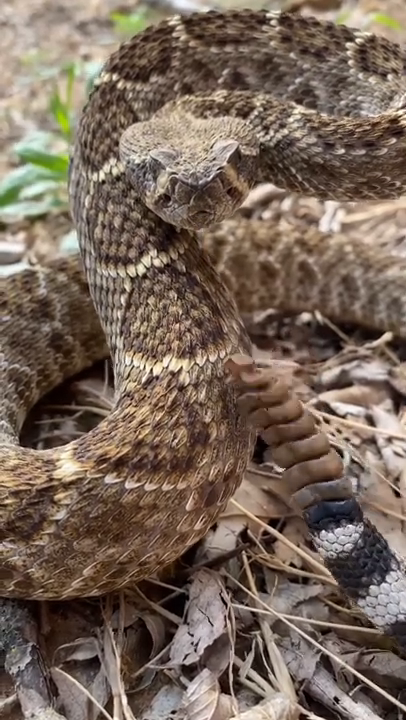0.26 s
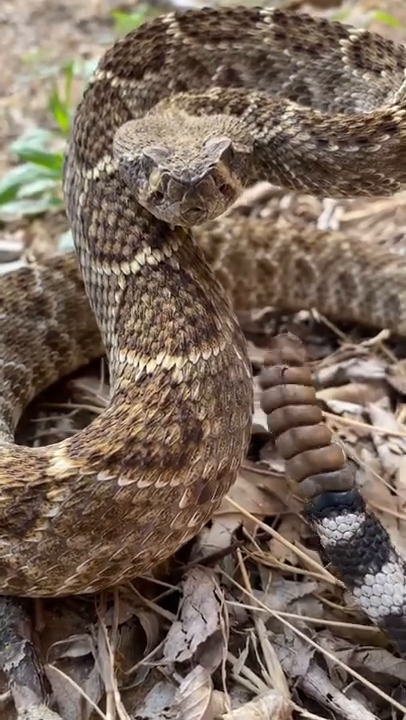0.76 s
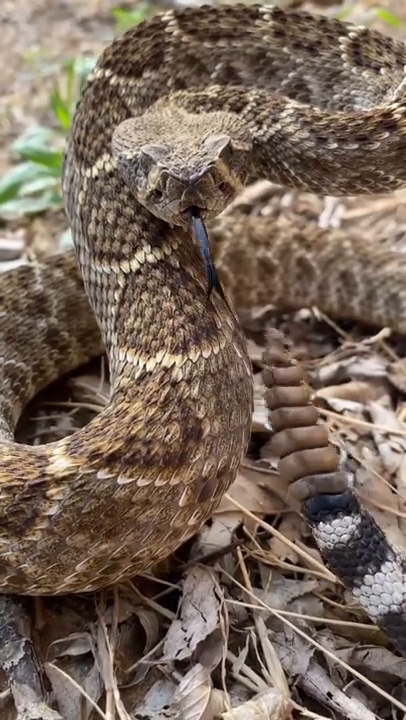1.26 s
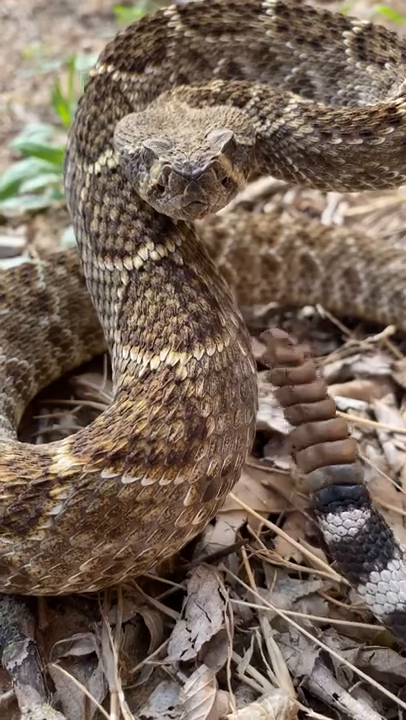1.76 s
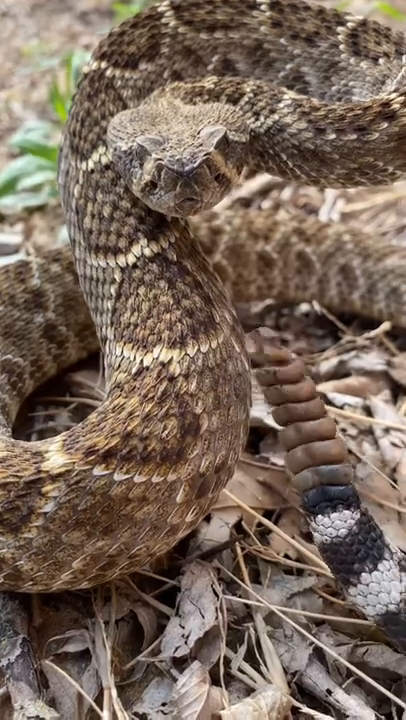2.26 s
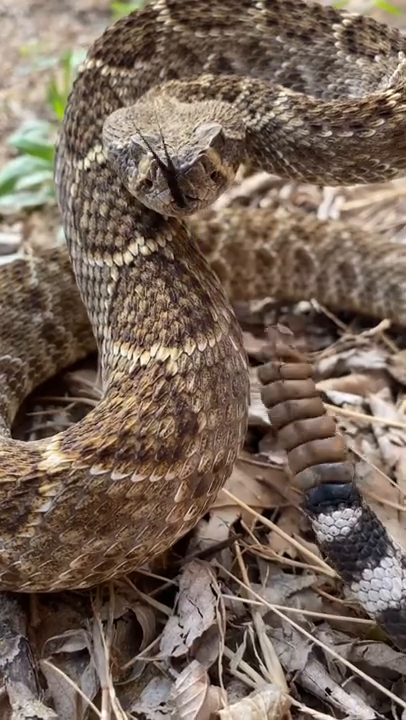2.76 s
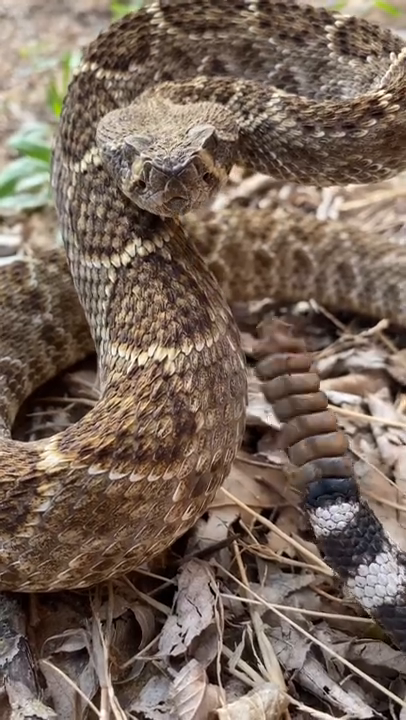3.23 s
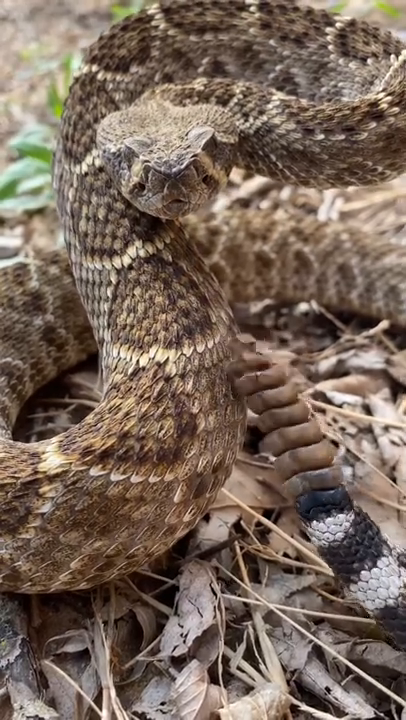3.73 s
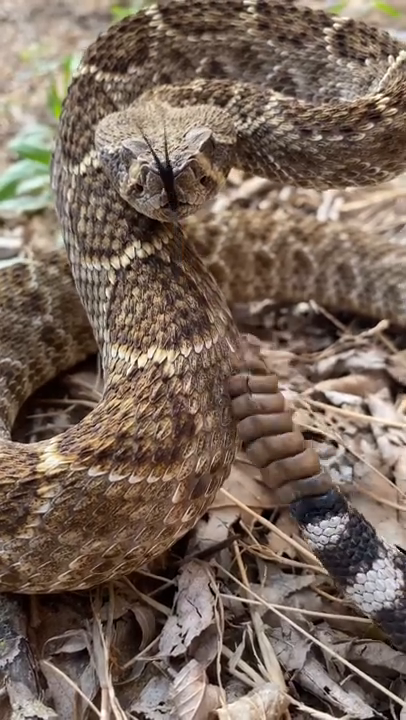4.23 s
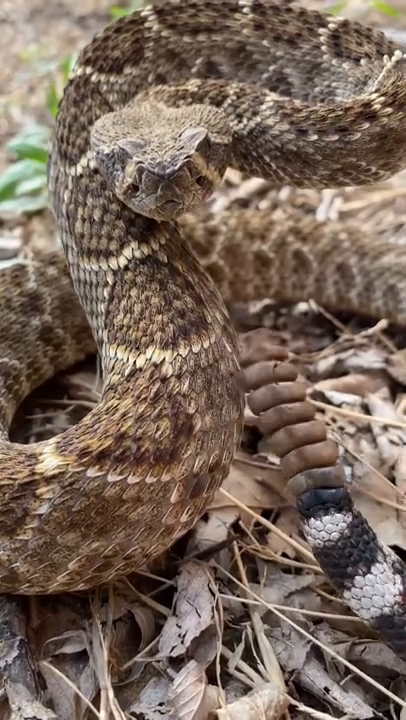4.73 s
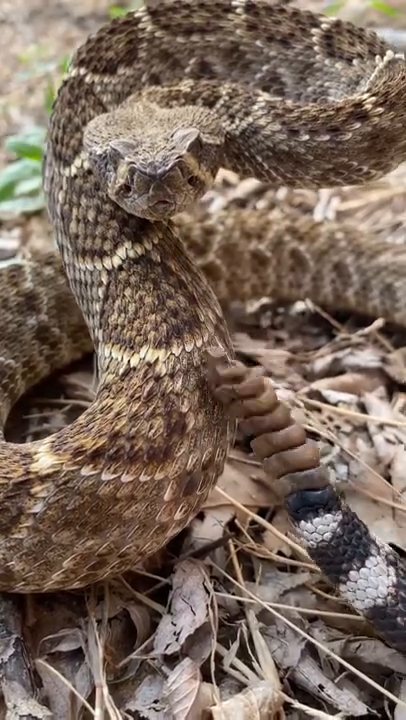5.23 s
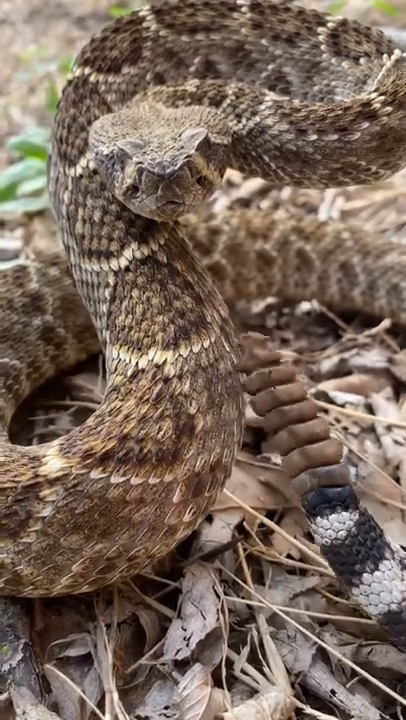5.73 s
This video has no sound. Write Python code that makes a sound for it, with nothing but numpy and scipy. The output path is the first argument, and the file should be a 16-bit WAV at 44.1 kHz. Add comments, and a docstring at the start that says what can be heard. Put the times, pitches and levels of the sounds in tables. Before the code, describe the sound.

A rattlesnake buzzes its tail without pause, very close to a stereo microphone outdoors. The dry, bright sound flutters about twenty-two times a second, thick with tiny clicks and a leafy hiss. Irregular catches and hard snaps stick out, more in the second half. Low wind thumps nudge the microphone around one and a half seconds and near the end, over a faint rumble.

```python
"""A dry, fierce buzz runs throughout: a coiled rattlesnake shaking its tail, close to the microphone.
About 22 sweeps a second each throw a shower of tiny pings between the hollow horn segments, with hard catches
and single snaps standing out. Dry leaf litter under the tail scatters the buzz as a fine hiss.
Light gusts and low thumps buffet the two microphone ports, as noise and short pulses.
Beneath lie a low outdoor rumble and a faint far drone, both of coloured noise."""
import sys
import numpy as np
from scipy import signal
from scipy.fft import rfft, irfft, next_fast_len
from scipy.io import wavfile
from scipy.ndimage import uniform_filter1d, map_coordinates

SR = 44100
rng = np.random.default_rng(int(sys.argv[2]) if len(sys.argv) > 2 else 0)


def output_pcm(signal):
    """Save a mono or channel-first signal as 16-bit PCM at the path in sys.argv[1].

    Samples are clipped to [-1, 1] before scaling.
    """
    pcm = np.clip(np.atleast_2d(signal).T, -1, 1) * 32767
    wavfile.write(sys.argv[1], SR, np.round(pcm).astype(np.int16))


N = 264159

# the tail's pace: time_s, pace_sweeps_per_s
TAIL_PACE = [(0.0, 19.25), (0.1, 21.2), (0.4, 20.77), (0.5, 23.21), (0.9, 21.29), (1.0, 22.4), (1.1, 21.26),
             (1.2, 23.56), (1.3, 19.76), (1.5, 22.79), (1.8, 23.29), (2.0, 21.58), (2.3, 20.81),
             (2.4, 23.19), (2.6, 22.5), (2.8, 23.34), (3.0, 22.02), (3.1, 22.63), (3.4, 21.45),
             (3.8, 21.65), (4.0, 19.97), (4.1, 20.98), (4.3, 19.93), (4.5, 22.83), (4.6, 20.78),
             (4.7, 22.0), (4.9, 21.38), (5.0, 22.55), (5.2, 20.31), (5.4, 22.17), (5.7, 21.87),
             (6.0, 23.62)]
# how far the rattle settles between sweeps: time_s, depth_multiple (of the sweep shape below)
SWING_DEPTH = [(0, .95), (1.7, .85), (2.1, .95), (2.6, .85), (3.1, .95), (3.3, 1.5), (5.0, 1.5), (5.6, 1.3),
               (6, .95)]
# force through one sweep of the tail: phase_cycles, strength_db
SWEEP_SHAPE = [(0, -3), (.14, 0), (.28, 2.9), (.56, 2.3), (.8, -3.3), (.92, -4.6), (1, -3)]
# hard catches, where loose segments land together: landing_s, force_after_db, force_before_db
# (both relative to the rms force; the one before is mostly a hush)
HARD_CATCHES = [(0.022, 5, -9), (0.353, -1, -14), (0.406, 3.0, -8.0), (0.541, 4, -2), (0.671, 6, -7),
                (0.807, 8, -9), (0.991, 2, -12), (1.128, 4, -8.0), (1.311, 5.0, -7), (1.674, 8, -3),
                (2.023, 3, -10), (2.215, 3.0, -11), (2.83, -3.0, -12), (2.925, 13, -8), (3.104, -1, -3),
                (3.234, 0, -12), (3.288, 4, -4.0), (3.328, 1.5, -9), (3.422, 7, -6.5), (3.513, 3.0, -10),
                (3.606, 3, -5.0), (3.657, 3, -12), (3.754, 27, 3), (3.839, 6, -7.0), (3.939, 6, -17),
                (3.979, 2.0, -15), (4.129, 2, -7.0), (4.228, 12, -10), (4.279, 6, -5), (4.376, 7, -9),
                (4.426, 5.0, -3.0), (4.651, 4.0, -8.0), (4.883, 11, -7.0), (4.938, 17, 12),
                (5.021, 5, -4.0), (5.208, 15, -7), (5.256, 5, -2), (5.442, 17, 2), (5.487, 2.5, -4.0),
                (5.574, 4.0, -12), (5.851, 11, -2), (5.936, 0, -4)]
# single hard snaps that stand out of the buzz: time_s, strength_db (the strongest is its peak over the rms buzz)
SINGLE_SNAPS = [(2.088, 14), (4.19, 19), (4.388, 16), (4.429, 9), (4.651, -8), (4.662, 22), (4.893, 11)]
# ring of the horn segments: frequency_hz, relative_level_db_per_hz
SHELL_RING = [(200, -38), (600, -27), (950, -22.3), (1900, -26.2), (2550, -21.7), (2900, -21),
              (3550, -11.3), (4000, -11.3), (4300, -8.6), (4680, -4.3), (4980, -6.3), (5800, 0),
              (6700, -4.3), (7250, -3.8), (7850, -11.2), (9200, -7.7), (10300, -13.2), (12600, -8),
              (15500, -16)]
# ring of the small tip segments: frequency_hz, relative_level_db_per_hz
TIP_RING = [(200, -77), (5000, -47), (8000, -3), (9500, 15), (12500, -4), (15500, -1)]
# how much of the rattle the leaves scatter: frequency_hz, level_db (relative to the direct sound)
LEAF_SCATTER = [(500, -1), (1000, -6.5), (1800, -9), (2400, -1.5), (3300, -1), (5000, -4), (5600, -10),
                (7100, -6.5), (7900, -1.5), (9000, -4.5), (10400, -3.5), (12500, -13)]
# the rattle at the two microphone ports: frequency_hz, left_minus_right_db
PORT_BALANCE = [(200, 3), (600, 7), (1000, -1.5), (1900, -2.5), (2400, -10), (3400, -12), (4250, 4.5),
                (4650, 1), (4950, -6), (5400, 0)]
# phase between the ports: frequency_hz, left_lead_rad
PORT_LEAD = [(200, 0), (600, -1.5), (1300, -.9), (2550, .6), (3300, -2.8), (4100, -2.4), (4400, -3.8),
             (4850, -3), (5060, .4), (6600, .5), (8000, 1.7), (9500, 2.1), (11500, np.pi)]
# puffs of wind on the microphone: start_s, length_s, level_db
WIND_PUFFS = [(0, 1.13, -51), (0.526, 0.12, -56), (1.173, 0.25, -45.5), (1.492, 0.23, -42),
              (4.275, 0.22, -51), (4.697, 0.4, -59.5), (5.43, 0.31, -42.5), (5.798, 0.38, -41)]
# colour of the wind buffeting: frequency_hz, relative_level_db_per_hz
BUFFET_COLOUR = [(20, -36), (46, 1.5), (72, -1), (140, -12), (200, -19.5), (400, -25), (800, -62)]
# the strongest eddies at the microphone: time_s, pitch_hz, peak_db
EDDIES = [(0.591, 90, -37), (1.159, 65, -39), (1.202, 130, -39), (1.221, 75, -30), (1.288, 118, -34),
          (1.31, 64.7, -35), (1.485, 80, -33), (1.501, 159, -35), (1.516, 70, -26.5), (1.589, 136, -28.5),
          (1.622, 110, -34), (1.62, 251, -35), (1.666, 136, -34), (1.685, 85, -31), (1.715, 83.6, -38),
          (5.457, 110, -39), (5.566, 108, -34), (5.812, 100, -36.5), (5.881, 80.4, -31.5)]
# colour of the outdoor background: frequency_hz, relative_level_db_per_hz
AIR_COLOUR = [(20, -37), (36, -13), (55, -2.5), (100, 0), (150, -7.5), (230, -5.5), (330, -13), (600, -22),
              (1200, -47), (4000, -12.5), (15000, -85)]
# background level: time_s, level_db
RUMBLE_LEVEL = [(0, -50.5), (1, -50.5), (2, -53.5), (2.8, -54), (2.92, -51.5), (4.2, -51), (6, -48)]
# colour of a far drone: frequency_hz, relative_level_db_per_hz
DRONE_COLOUR = [(80, -29), (165, -2.5), (240, -7), (330, -14), (600, -44)]
# the drone swells, fades and swells again: time_s, level_db
DRONE_LEVEL = [(1.8, -65.5), (2.6, -56), (3.6, -55.5), (4.4, -65), (5.3, -55.5)]

RATTLE_DB, DB_PER_SWEEP = -28, 0.25  # level at the mean pace and swing 1; dB per extra sweep a second
SWING_DB = 0.34  # extra level, dB per unit of swing depth
LIMP_CYCLES = 0.0037  # left and right sweeps are a little unequal
FLIGHT_S, CATCH_S, LANDING_S = 0.012, 0.0098, 0.0016  # before a catch; the catch; segments not landing quite at once
# dull knocks early in each sweep: rise and fall of their level, phase of the peak in cycles, upper edge
EARLY_DB, EARLY_PEAK, HOLLOW_HZ = 1.93, 0.13, 2460
BRIGHT_DB, BRIGHT_HZ = 5.5, 9700  # wider swings clash brighter: dB per unit of swing; lower edge of that treble
GUST_RISE_S, GUST_FALL_S = 0.072, 0.087  # each puff builds before its start and dies after its end
LOW_CUT_HZ, TOP_HZ = 32, 15800  # microphone bass roll-off and band limit


def snake(wander_db=0.43):
    """The direct and the scattered rattle reach two microphone ports of unlike colour and phase."""
    phase = sweep_phase()
    force = shaking(phase)
    sides = np.array([[.5], [-.5]])
    direct = filtered(rattle(force), lambda hz: np.exp(1j * sides * along(PORT_LEAD, hz)))
    scattered = filtered(leaves(force), lambda hz: amp(along(LEAF_SCATTER, hz)))

    def ports(hz):
        """Port balance; scattering shares out the sound's energy without adding to it."""
        return amp(sides * along(PORT_BALANCE, hz)) / np.hypot(1, amp(along(LEAF_SCATTER, hz)))

    heard = filtered(stroke_colour(direct + scattered, phase), ports)
    pace = curve(TAIL_PACE)
    effort_db = RATTLE_DB + DB_PER_SWEEP * (pace - pace.mean())
    effort_db = effort_db + SWING_DB * (curve(SWING_DEPTH) - 1) + wander_db * wobble(4.6)
    return amp(effort_db) * levelled(heard, 2 / pace.mean())


def sweep_phase():
    """How far the tail is through its present sweep, 0-1, from its summed and slightly unsteady pace."""
    cycle = .72 + np.cumsum(curve(TAIL_PACE)) / SR + .008 * wobble(27)
    return (cycle - LIMP_CYCLES * np.cos(np.pi * cycle)) % 1


def shaking(phase, ceiling_db=6):
    """Force on the segments: it swells in every sweep, up to what their joints allow, with evened energy."""
    sweep_s = 1 / np.mean(curve(TAIL_PACE))
    sweep_db = curve(SWING_DEPTH) * np.interp(phase, *np.transpose(SWEEP_SHAPE))
    force = catches(unit(amp(sweep_db) * levelled(tumbles(), sweep_s / 2)))
    force = force / (1 + (force / amp(ceiling_db)) ** 4) ** .25
    return levelled(force, sweep_s)


def tumbles(count=1200, irregular=.45, spread_db=0.2, width=0.0015, between_db=-12, size=512):
    """The segments land in groups, a few milliseconds apart: separate bursts with quiet gaps, rms 1."""
    t = np.arange(-size, size + 1) / SR
    gaps, strengths = rng.standard_normal((2, count))
    gaps = np.exp(irregular * np.clip(gaps, -2, 2))
    start = ((np.cumsum(gaps) - gaps) / gaps.sum() * N).astype(int)
    blows = np.bincount(start, amp(spread_db * strengths) ** 2, N)
    power = abs(signal.fftconvolve(blows, np.exp(-abs(t) / width), "same"))
    return unit(np.sqrt(power / power.mean() + amp(between_db) ** 2))


def catches(force):
    """The segments fly free for a moment, then land together: the force steps between two levels."""
    force = force.copy()
    for landing_s, after_db, before_db in HARD_CATCHES:
        t = np.arange(N) / SR - landing_s
        close = abs(t) < .05
        t = t[close]
        near = np.exp(-(t / np.where(t < 0, FLIGHT_S, CATCH_S)) ** 4)
        landed = (1 + np.tanh(t / LANDING_S)) / 2
        caught = (1 - landed) * amp(before_db) + landed * amp(after_db)
        force[close] = (1 - near) * force[close] + near * caught
    return force


def rattle(force, knock_db=-4, tick_db=-10):
    """Hard knocks among many light touches ring the hollow segments; the tip adds small bright ticks."""
    touches = collisions(count=45000, spread_db=1.0, life=0.00024, scatter=2)
    knocks = collisions(count=6000, spread_db=1.5, life=.00005, scatter=.3)
    ticks = collisions(count=1800, spread_db=6.0, life=.00005, scatter=2.3)
    shell = unit(ring(force * (touches + amp(knock_db) * knocks), SHELL_RING))
    tip = unit(ring(force * ticks, TIP_RING))
    return shell + snaps() + amp(tick_db) * tip


def collisions(count, spread_db, life, scatter, size=64):
    """Tiny decaying pings in an uneven chain (scatter in mean gaps), each of its own strength and pitch."""
    t = np.arange(size) / SR
    place = np.arange(count) + scatter * rng.standard_normal(count)
    start = (place * N / count).astype(int) % N
    pitch_hz = rng.uniform(0, TOP_HZ, (count, 1))
    angle = rng.uniform(0, 2 * np.pi, (count, 1))
    strength = amp(spread_db * np.clip(rng.standard_normal((count, 1)), -3, 2))
    pings = strength * np.sin(2 * np.pi * pitch_hz * t + angle) * t * np.exp(-t / life)
    return unit(np.bincount((start[:, None] + np.arange(size)).ravel(), pings.ravel(), N)[:N])


def snaps():
    """Now and then one segment hits its neighbour squarely: a single impulse rings the shell."""
    blows = np.zeros(N)
    for time_s, strength_db in SINGLE_SNAPS:
        blows[round(time_s * SR)] = amp(strength_db)
    rung = ring(blows, SHELL_RING)
    return rung * blows.max() / abs(rung).max()


def leaves(force, linger=0.00021):
    """The litter blurs the collisions into a fine hiss that trails them, different at each port."""
    fade = np.exp(-np.arange(SR // 50) / SR / linger)
    trail = np.sqrt(abs(signal.fftconvolve(force ** 2, fade)[:N]))
    return unit(np.array([ring(trail * hiss, SHELL_RING) for hiss in rng.standard_normal((2, N))]))


def stroke_colour(x, phase):
    """Dull knocks are strongest early in each sweep and weakest half a cycle on; wide swings are brightest."""
    hollow = filtered(x, lambda hz: 1 / (1 + (hz / HOLLOW_HZ) ** 6))
    treble = x - filtered(x, lambda hz: 1 / (1 + (hz / BRIGHT_HZ) ** 16))
    early = amp(EARLY_DB * np.cos(2 * np.pi * (phase - EARLY_PEAK)))
    bright = amp(BRIGHT_DB * (curve(SWING_DEPTH) - 1.5))
    return x + (early - 1) * hollow + (bright - 1) * treble


def wind(lump_db=3.5):
    """Light gusts rise, hold and fall, fluttering on the two ports almost independently."""
    gusts = 0
    for start_s, length_s, level_db in WIND_PUFFS:
        end_s = start_s + length_s
        puff = [(start_s - GUST_RISE_S, 0), (start_s, 1), (end_s, 1), (end_s + GUST_FALL_S, 0)]
        gusts = gusts + amp(level_db) * curve(puff)
    return gusts * amp(lump_db * wobble(30)) * levelled(stereo_noise(BUFFET_COLOUR, alike=0.028), span=0.058)


def thumps(cycles=0.59):
    """A large eddy pushes and pulls on each port: a sine under a bell-shaped swell about a cycle long."""
    t = np.arange(N) / SR
    angles = rng.uniform(0, 2 * np.pi, (len(EDDIES), 1, 1))
    angles = angles + .5 * rng.standard_normal((len(EDDIES), 2, 1))  # the ports differ a little
    total = 0
    for (time_s, pitch_hz, peak_db), angle in zip(EDDIES, angles):
        swell = np.exp(-((t - time_s) * pitch_hz / cycles) ** 2)
        total = total + amp(peak_db) * swell * np.sin(2 * np.pi * pitch_hz * (t - time_s) + angle)
    return total


def outdoors(drift_db=0.96):
    """A soft, uneven rumble and a faint drone from far away, both coloured noise."""
    rumble = amp(curve(RUMBLE_LEVEL) + drift_db * wobble(15)) * stereo_noise(AIR_COLOUR, alike=0.81)
    return rumble + amp(curve(DRONE_LEVEL)) * stereo_noise(DRONE_COLOUR, alike=0.9)


def stereo_noise(spectrum, alike):
    """Coloured noise of rms 1 whose two channels correlate by alike."""
    mid, side = filtered(rng.standard_normal((2, N)), lambda hz: amp(along(spectrum, hz)))
    turn = np.arccos(np.clip(alike, -1, 1)) / 2
    return unit(np.cos(turn) * mid + np.sin(turn) * np.array([side, -side]))


def ring(x, spectrum, size=2048):
    """x through a causal, minimum-phase body with this (Hz, dB) spectrum."""
    cepstrum = irfft(np.log(amp(along(spectrum, np.fft.rfftfreq(size, 1 / SR)))))
    # folding the cepstrum forward makes the response start at once
    cepstrum[1:size // 2] *= 2
    cepstrum[size // 2 + 1:] = 0
    return signal.fftconvolve(x, irfft(np.exp(rfft(cepstrum))))[:N]


def filtered(x, response):
    """x times a complex response of frequency."""
    m = next_fast_len(N + SR // 2)
    return irfft(rfft(x, m) * response(np.fft.rfftfreq(m, 1 / SR)), m)[..., :N]


def levelled(x, span):
    """x with its power evened out over span seconds."""
    power = uniform_filter1d(np.mean(np.atleast_2d(x) ** 2, axis=0), int(span * SR))
    return x / np.sqrt(abs(power) + 1e-12)


def wobble(rate):
    """A smooth random curve, rate knots a second."""
    return map_coordinates(rng.standard_normal(int(N * rate / SR) + 4), [np.arange(N) * rate / SR])


def curve(rows):
    """(s, value) rows as one value per sample."""
    return np.interp(np.arange(N) / SR, *np.transpose(rows))


def along(points, hz):
    """(Hz, value) points read on a log axis."""
    f, v = np.transpose(points)
    return np.interp(np.log(hz + 1), np.log(f + 1), v)


def unit(x):
    """x at rms 1."""
    return x / np.sqrt(np.mean(x ** 2) + 1e-20)


def amp(db):
    """Decibels to gain."""
    return 10 ** (np.asarray(db) / 20)


def scene():
    """The snake close by, wind on the microphone, and the open air behind."""
    return snake() + wind() + thumps() + outdoors()


def record(dry):
    """The microphone trims the deepest bass and keeps nothing above its band limit."""
    return filtered(dry, lambda hz: (1 - 1 / (1 + (hz / LOW_CUT_HZ) ** 6)) * (hz < TOP_HZ))


dry = scene()
out = record(dry)
output_pcm(out)
```